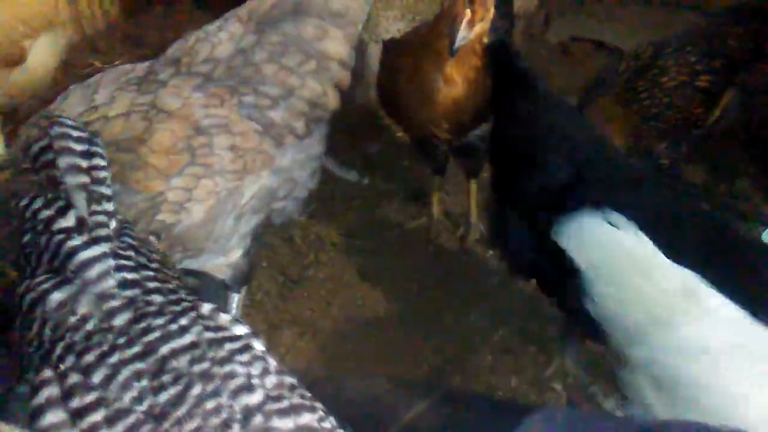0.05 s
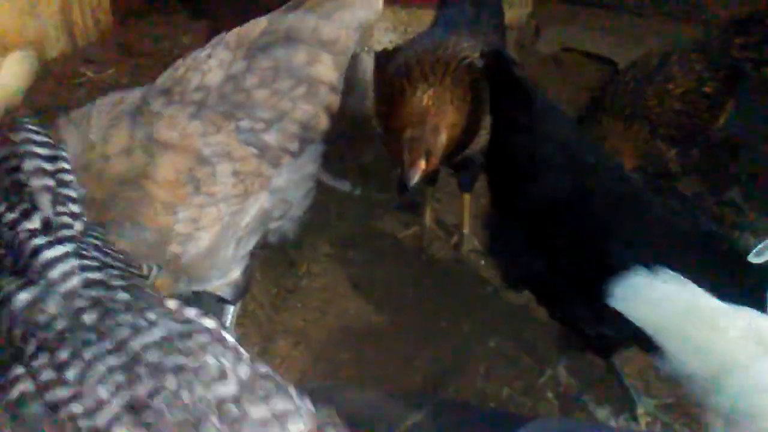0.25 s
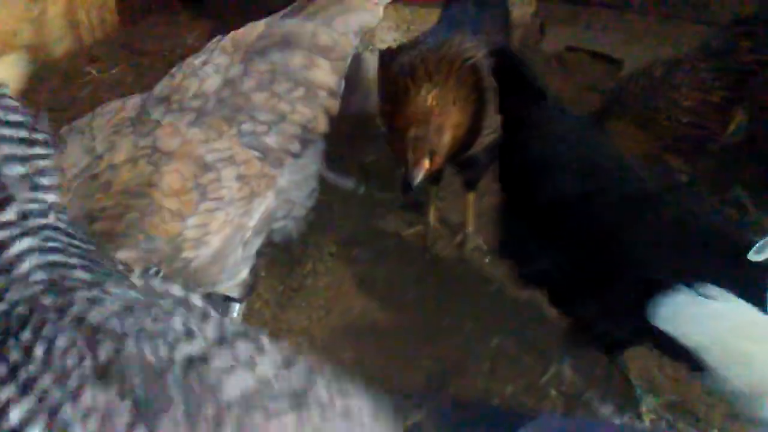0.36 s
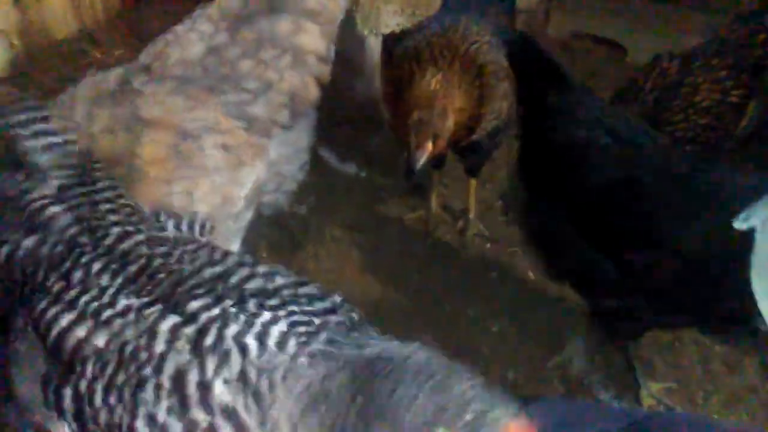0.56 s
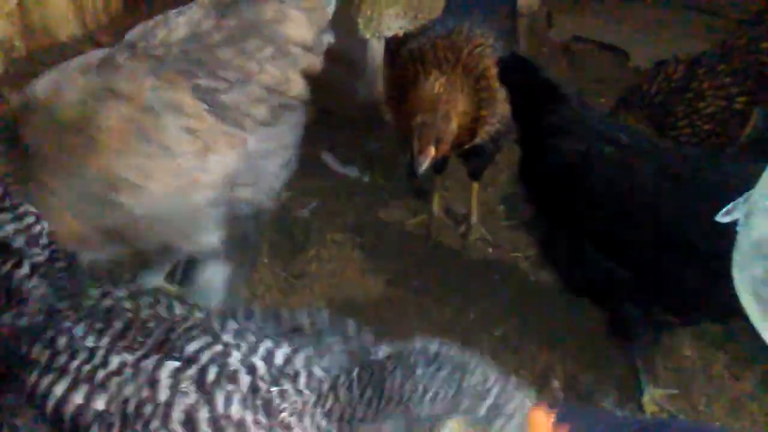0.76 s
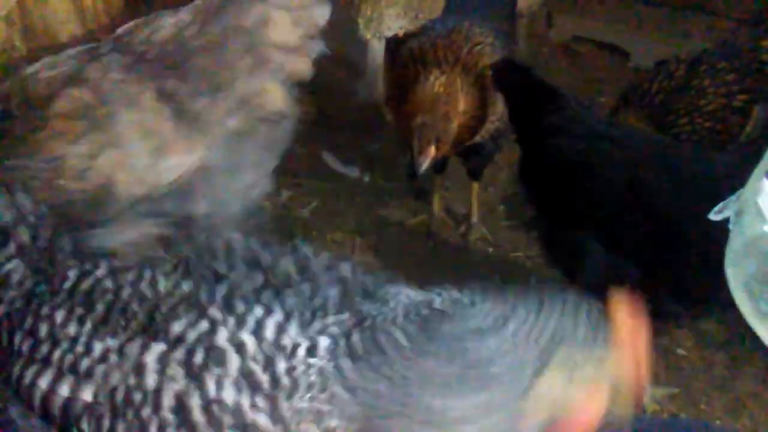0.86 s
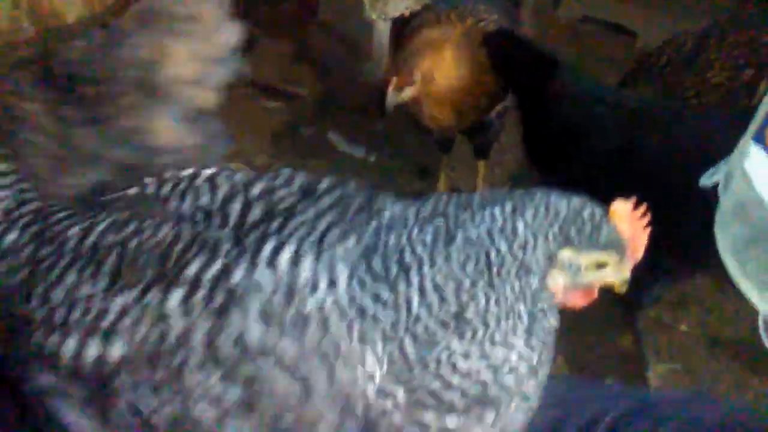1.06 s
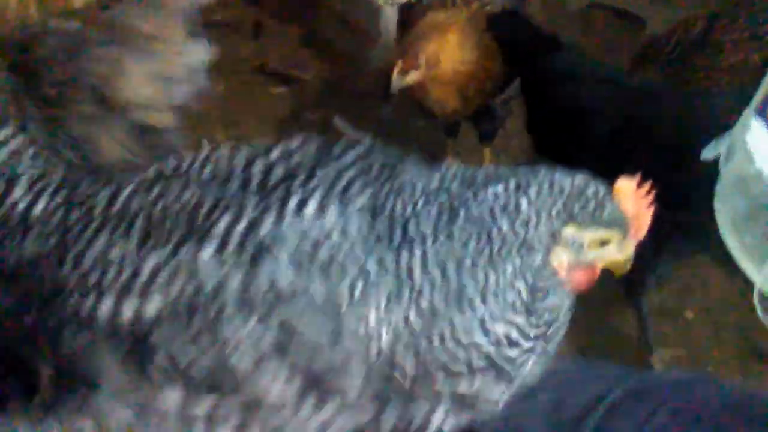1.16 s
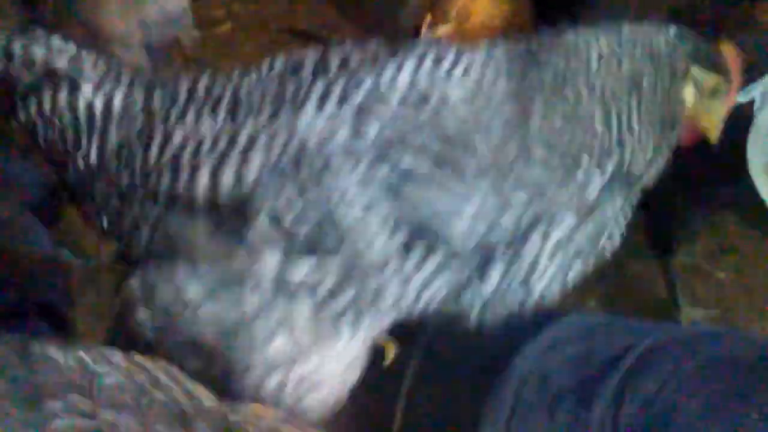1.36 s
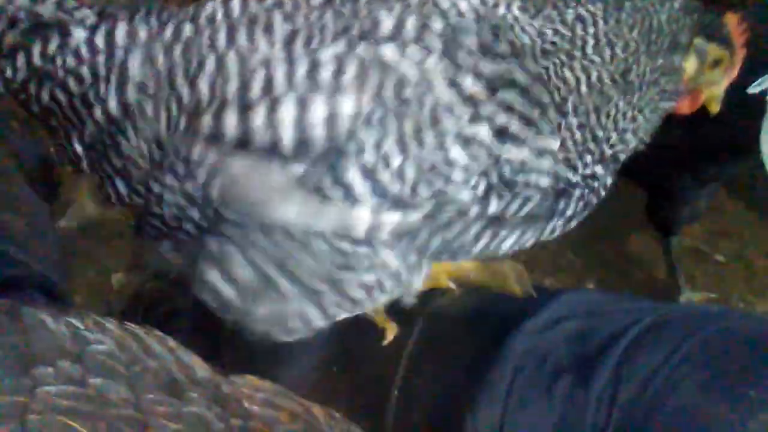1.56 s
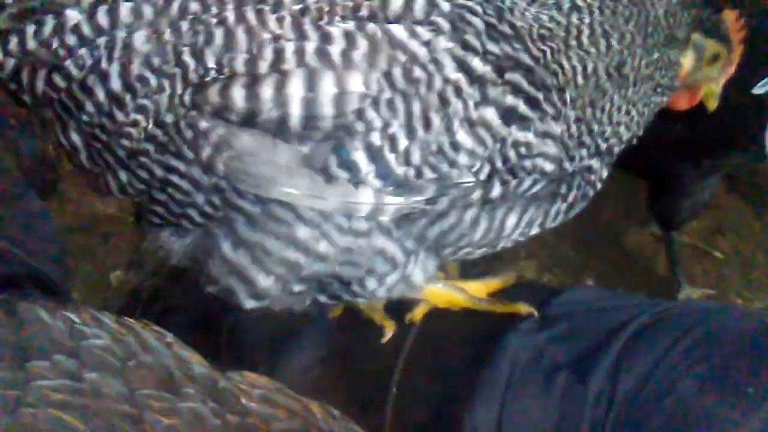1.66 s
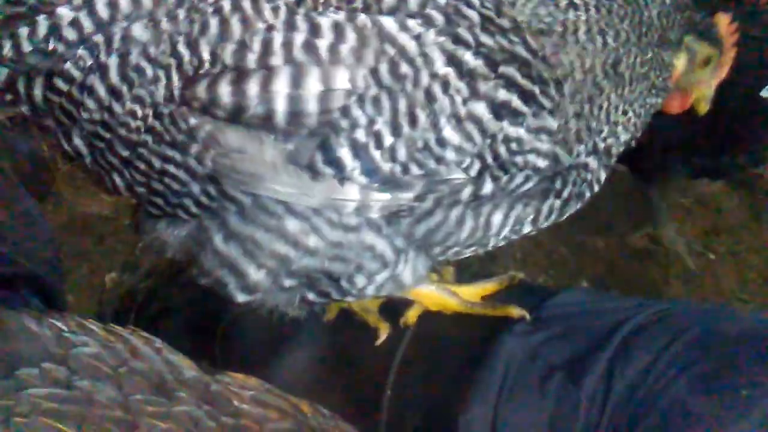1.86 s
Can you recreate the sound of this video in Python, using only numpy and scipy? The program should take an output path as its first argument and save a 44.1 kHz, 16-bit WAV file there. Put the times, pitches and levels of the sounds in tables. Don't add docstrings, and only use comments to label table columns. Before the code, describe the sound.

Young chickens cluck and peep close by in a small coop, with feet knocking and litter scuffling.

```python
import sys
import numpy as np
from scipy import signal
from scipy.fft import rfft, irfft, next_fast_len
from scipy.io import wavfile
from scipy.ndimage import uniform_filter1d

SR = 44100
rng = np.random.default_rng(int(sys.argv[2]) if len(sys.argv) > 2 else 0)


def dump_mix(stems):
    frames = np.atleast_2d(stems).T
    limited = np.clip(frames, -1, 1)
    pcm = np.round(limited * 32767).astype(np.int16)
    wavfile.write(sys.argv[1], SR, pcm)


def volts_from_decibels(level):
    exponent = np.asarray(level, float) / 20
    return 10 ** exponent


N = 83790

# t/s, f/Hz, level/dB after the microphone
PEEP1_LOW = [(.095, 3824, -43), (.11, 3560, -48.5), (.155, 2938, -36), (.17, 2833, -15.5),
             (.187, 2566, -21.5), (.2, 1942, -23), (.208, 1227, -9), (.232, 1074, -41.5)]
PEEP1_HIGH = [(0.091, 4760, -84), (0.109, 4550, -77), (.125, 4120, -41), (0.144, 3853, -27),
              (0.155, 3720, -28), (0.167, 3220, -70)]
PEEP2_LOW = [(0.531, 4020, -52), (0.566, 3512, -41), (0.593, 2950, -40), (.645, 2552, -34.5),
             (0.658, 2408, -34.5), (0.667, 1648, -8), (0.672, 1083, -28.5), (.685, 1276, -37)]
PEEP2_HIGH = [(.485, 6800, -53.5), (0.538, 5690, -65.5), (.565, 4800, -68.5), (0.597, 4240, -39.5),
              (0.611, 3930, -40), (0.626, 3400, -43), (0.632, 2800, -50)]
PEEP3_LOW = [(1.385, 3255, -65), (1.418, 3925, -33.5), (1.452, 3560, -36.5), (1.49, 3047, -30.5),
             (1.55, 2711, -27.5), (1.598, 2654, -21.5), (1.613, 2584, -27)]
PEEP3_HIGH = [(1.4, 5947, -57), (1.418, 5430, -65), (1.436, 4920, -55), (1.452, 4856, -58),
              (1.48, 4520, -53.5), (1.529, 4147, -33), (1.57, 4038, -24.5), (1.611, 3410, -28.5),
              (1.63, 2602, -9.5), (1.654, 2240, -88)]
# start t/s, length/s, rate f/Hz, depth/0-1
FLUTTER = [
    (0.162, 0.059, 689, 0.67),
    (0.616, 0.032, 650, 1),
    (1.51, 0.081, 234, 0.45),
]
PEEP_RICHNESS = [-0.5, 4, -2]
VOICE_OVERTONES = [
    [-15, -26, -19],
    [-10, -22, -50],
]
# times low, times high, level/dB
SUM_TONES = [(0.81, 1, -21), (2, 1.1, -21.5), (1.1, 2, -16)]
# f/Hz, level/dB
BEAK = [(2500, 12), (3300, -2), (10800, -1), (13000, -12)]
# start t/s, length/s,
# level/dB, first f/Hz, last f/Hz
FAINT_WHISTLES = [(.355, 0.02, -47, 1970, 2500), (.495, .031, -45, 1570, 2230), (1.009, 0.05, -40, 1420, 1468),
                  (1.344, 0.02, -35, 1783, 1610), (1.422, 0.027, -33, 6900, 5100), (0.79, 0.06, -50, 3560, 3380),
                  (.81, .05, -53, 3150, 2950), (.845, .055, -51, 3350, 2750), (.885, .05, -53, 2550, 2380),
                  (1.075, .035, -50, 2550, 2400), (1.483, 0.0337, -40.5, 1360, 1100),
                  (1.507, 0.045, -42, 1080, 1300), (1.512, .035, -40.5, 1200, 1520),
                  (1.591, 0.024, -43, 1770, 1600), (1.654, 0.051, -44.5, 3010, 2696),
                  (1.691, 0.057, -42.5, 2450, 2270), (1.871, 0.0217, -49.5, 860, 1500)]
# start t/s, length/s, level/dB, first f/Hz, last f/Hz
CLUCKS = [(-.01, 0.048, -38, 368, 346), (0.047, 0.064, -37.5, 334.3, 357.5),
          (0.111, 0.091, -44, 365, 374.4), (0.206, 0.022, -22.5, 453, 466.4),
          (0.227, 0.069, -22, 442.3, 420.4), (0.312, .025, -39.5, 400, 396),
          (0.393, 0.039, -19, 480, 379.1), (0.981, 0.033, -37, 362.6, 355.6),
          (1.116, 0.058, -31.5, 349.5, 346.3), (1.111, 0.031, -33.5, 473, 503),
          (1.168, 0.072, -44, 340.6, 333.3), (1.381, 0.051, -25, 389.3, 374.7)]
# octave level/dB, upper partials level/dB, beak ring level/dB, fade/(dB per s)
HEN_VOICES = [(6, -3, -15, -100), (5.5, 6.5, 6, -14), (-29, 3, 13, -43), (-13.5, -10, -6, -6),
              (-7.5, -7.5, -10, -120), (-5, -5, -7, -47), (4, -7.5, 11.5, 15), (-10, 3.5, -4, -46),
              (-7, -10.5, 13, 87), (-11, -21, 5, -34), (-13, -6.5, 5.5, -38), (-12, -10, -1, -200)]
HOARSENESS = [.3, .07, .3, .3, .35, .3, .06, .25, .12, 0, .3, .12]
# f/Hz, level/dB
THROAT = [(400, -20.5), (1100, -7.5), (1450, -5.5), (2000, -20.5), (2700, -16.5), (4000, -32.5),
          (7500, -24.5), (12000, -36)]
# t/s, peak level/dB, ring f/Hz
KNOCKS = [(0.4772, -6.5, 364), (0.489, -24.5, 340), (0.504, -23.5, 333), (0.557, -30, 334),
          (0.725, -25, 362), (0.728, -33.5, 190), (0.762, -43, 222), (0.806, -49, 245), (.864, -37, 780),
          (0.877, -43.5, 202), (0.95, -36, 325), (1.010, -18, 616), (1.309, -32, 392), (1.444, -43, 264),
          (1.491, -37, 245), (1.512, -39, 235), (1.663, -43, 318), (1.802, -36, 472), (1.874, -40, 297)]
# t/s, peak level/dB, centre f/Hz
TICKS = [(.0538, -45, 8600), (0.4755, -21.5, 8750), (0.663, -39, 8800), (.725, -31, 1610),
         (0.944, -34.5, 1010), (0.9992, -35.5, 7800), (1.361, -41, 7450), (1.3839, -32, 10500),
         (1.446, -23, 11000), (1.541, -40, 12100), (1.689, -26, 8200), (1.724, -29.5, 1420),
         (1.798, -31, 8000), (1.803, -32, 1680)]
# start t/s, length/s, level/dB, centre f/Hz
SCUFFLES = [(0.162, 0.084, -20, 1320), (0.253, 0.067, -24.5, 1060), (0.45, 0.066, -20, 750),
            (0.97, 0.047, -39, 376), (0.641, 0.073, -28, 1380), (0.95, 0.02, -39.5, 800),
            (0.986, 0.12, -35, 1210), (1.106, 0.076, -31, 1510), (1.287, 0.049, -38, 930),
            (1.683, 0.056, -32.5, 2950), (1.036, 0.046, -39, 480), (-.01, 0.027, -29, 1100),
            (.645, 0.054, -29.5, 474), (1.793, 0.053, -50, 3800), (0.887, 0.013, -43, 360)]
# start t/s, length/s, level/dB, centre f/Hz
RUSTLES = [(0.115, 0.13, -31.5, 8450), (.225, 0.042, -30, 8200), (0.402, .042, -30, 7160),
           (0.449, 0.067, -37, 8560), (0.552, 0.11, -32, 8650), (1.389, 0.044, -31, 8750),
           (1.554, 0.067, -33.5, 10300), (1.682, 0.079, -25.5, 7100), (1.657, 0.017, -39, 7670),
           (1.796, 0.068, -42.5, 7870)]
# f/Hz, level/dB per Hz
FLOCK = [(71, -52), (120, -6), (182, -4.5), (2120, -8.5), (3170, -16.5), (4200, -49), (5460, -77),
         (9240, -120)]
# t/s, level/dB
BUSTLE = [(0, -54.5), (.37, -45), (.6, -39.5), (0.731, -40.5), (0.79, -49.5), (1.2, -45.5), (1.267, -58.5),
          (1.3, -49.5), (1.45, -42.5), (1.9, -49.5)]
# f/Hz, level/dB
MICROPHONE = [(120, -20.5), (160, -2), (250, 2), (4050, -5), (4400, -28), (4700, -48), (5350, -27),
              (7000, -17.5), (10000, -17), (12500, -25.5)]


def curve(points, hz):
    p = np.array(points, float)
    return np.interp(np.log(np.maximum(hz, 1)), np.log(p[:, 0]), p[:, 1])


def colour(x, points):
    n = next_fast_len(N + 4096)
    hz = np.arange(n // 2 + 1) * SR / n
    return irfft(rfft(x, n) * volts_from_decibels(curve(points, hz)), n)[:N]


def unit(x):
    return x / np.sqrt(np.mean(x ** 2))


def walk(rate):
    k = int(SR / rate)
    return unit(uniform_filter1d(uniform_filter1d(rng.standard_normal(N), k), k))


def gate(start, length, edge):
    t = np.arange(N) / SR
    inside = np.minimum(t - start, start + length - t)
    return np.sin(np.pi / 2 * np.clip(inside / edge, 0, 1)) ** 2


def band(x, hz, q):
    return signal.lfilter(*signal.iirpeak(min(hz, SR / 3), q, SR), x)


def double_band(x, hz, q):
    return band(band(x, hz, q), hz, q)


def track(rows):
    r, t = np.array(rows, float), np.arange(N) / SR
    hz, db = [np.interp(t, r[:, 0], column) for column in r.T[1:]]
    return hz, db, gate(r[0, 0], r[-1, 0] - r[0, 0], 0.0027)


def whistle(hz, gain, overtones_db=(), rough=1):
    wobble, roughness = rough * .007, rough * .17
    phase = 2 * np.pi * np.cumsum(hz * (1 + wobble * walk(88))) / SR
    glide = uniform_filter1d(np.abs(np.gradient(hz)) * SR, size=200) / 52000
    upper = 0
    for k, db in enumerate(overtones_db, 2):
        patchy = volts_from_decibels(db + curve(BEAK, k * hz) + 4.5 * walk(38)) * (1 + .5 * walk(200))
        smother = np.where(k * hz < 2700, 1, 1 / (1 + glide ** 4))
        smother = np.where(k * hz < 2700, smother, 1 / (1 + glide ** 4))
        upper = upper + patchy * np.sin(k * phase) * smother * (k * hz < SR / 2.2)
    relative = (gain / 0.041 + 0.075) ** -.4
    return np.sqrt(2) * gain * (1 + roughness * walk(250)) * (np.sin(phase) + relative * upper), phase


def sum_tones(low_gain, low_phase, high_gain, high_phase, rich_db):
    tones = 0
    for m, n, db in SUM_TONES:
        patchy = volts_from_decibels(db + rich_db + 4.5 * walk(36)) * (1 + .4 * walk(250))
        tones = tones + patchy * np.sin(m * low_phase + n * high_phase)
    return (low_gain * high_gain) ** 0.47 * tones


def peeps():
    out = 0
    pairs = (PEEP1_LOW, PEEP1_HIGH), (PEEP2_LOW, PEEP2_HIGH), (PEEP3_LOW, PEEP3_HIGH)
    for rich_db, pair, (start, length, rate_hz, depth) in zip(PEEP_RICHNESS, pairs, FLUTTER):
        flutter_phase = 2 * np.pi * np.cumsum(rate_hz * (1 + 0.18 * walk(119))) / SR
        shake = depth * gate(start, length, 0.011) * np.sin(flutter_phase)
        voices = []
        for rows, overtones_db in zip(pair, VOICE_OVERTONES):
            hz, db, on = track(rows)
            gain = on * volts_from_decibels(np.minimum(db - curve(MICROPHONE, hz), -18))
            voices.append((gain, *whistle(hz, gain, np.add(overtones_db, rich_db))))
        (low_gain, low, low_phase), (high_gain, high, high_phase) = voices
        out = out + sum_tones(low_gain, low_phase, high_gain, high_phase, rich_db)
        if rate_hz < 400:
            air = low + high * (1 + shake)
        else:
            air = (low + high) * (1 + shake + shake ** 2)
        size = np.sqrt(uniform_filter1d(air ** 2, 800) + 1e-6)
        out = out + air + 0.054 * 0.35 * air ** 2 / size
    return out


def faint_whistles():
    out, t = 0, np.arange(N) / SR
    for start, length, db, first_hz, last_hz in FAINT_WHISTLES:
        hz = np.interp(t, [start, start + length], [first_hz, last_hz])
        out = out + whistle(hz, volts_from_decibels(db) * gate(start, length, 0.084 * length), rough=3.2)[0]
    return out


def clucks():
    out, t = 0, np.arange(N) / SR
    attack_s, release_s, settle = 0.007, .005, 4.9
    for call, voice, rough in zip(CLUCKS, HEN_VOICES, HOARSENESS):
        start, length, db, first_hz, last_hz = call
        octave_db, upper_db, beak_db, fade_db = voice
        u = np.clip((t - start) / length, 0, 1)
        hz = last_hz + (first_hz - last_hz) * np.exp(-settle * u)
        attack = np.clip((t - start) / attack_s, 0, 1)
        release = np.exp(-np.maximum(t - start - length, 0) / release_s)
        on = attack * release * volts_from_decibels(db + fade_db * u * length)
        phase = 2 * np.pi * np.cumsum(hz * (1 + 0.0293 * rough * walk(250))) / SR
        shaky = [1 + rough * walk(150), 1 + 2 * rough * walk(190),
                 .5 + 3 * rough * walk(270), 0.11 + walk(350)]
        upper = 0
        for k in range(3, 30):
            beak_ring_db = beak_db * np.exp(-((k * last_hz - 2550) / 510) ** 2)
            level = volts_from_decibels(curve(THROAT, k * last_hz) + beak_ring_db)
            upper = upper + level * shaky[1 + (k > 4) + (k > 11)] * np.sin(k * phase + 1.3 * k * k)
        breath = unit(colour(rng.standard_normal(N), THROAT)) * (1 + np.cos(phase)) * (rough + 0.22)
        fundamental = shaky[0] * np.sin(phase)
        octave = volts_from_decibels(octave_db) * shaky[1] * np.sin(2 * phase + 3.54)
        out = out + np.sqrt(2) * on * (fundamental + octave + volts_from_decibels(upper_db) * (upper + breath))
    return out


def knocks():
    out, t = np.zeros(N + 4096), np.arange(4096) / SR
    for s, db, hz in KNOCKS:
        u = t * hz / 0.42
        thump = 2 * u ** 2 * np.exp(-u) * np.sin(2 * np.pi * hz * t)
        grit_tail = volts_from_decibels(-8.5) * band(rng.standard_normal(4096), 1500, 0.58) * np.exp(-t / 0.0052)
        out[int(s * SR):int(s * SR) + 4096] += volts_from_decibels(db) * (thump + grit_tail)
    return out[:N]


def claw_ticks():
    out, t = np.zeros(N + 4096), np.arange(4096) / SR
    for s, db, hz in TICKS:
        burst = rng.standard_normal(4096) * np.exp(-t / 0.0027)
        out[int(s * SR):int(s * SR) + 4096] += volts_from_decibels(db) * 4 * double_band(burst, hz, 1.6)
    return out[:N]


def grit():
    return unit(rng.standard_normal(N) * volts_from_decibels(3 * walk(300) + 2.3 * walk(110)))


def scuffles():
    out, t = 0, np.arange(N) / SR
    for s, length, db, hz in SCUFFLES:
        fade = volts_from_decibels(db - 15 * np.clip((t - s) / length, 0, 1))
        shape = gate(s, 1.09 * length, .5 * length) ** 0.17 * np.clip((t - s) / 0.0013, 0, 1)
        out = out + fade * shape * unit(band(band(grit(), hz, 1.0), hz, 0.79))
    return out


def rustles():
    out, t = 0, np.arange(N) / SR
    for s, length, db, hz in RUSTLES:
        fade = volts_from_decibels(db - 11 * np.clip((t - s) / length, 0, 1))
        hiss = unit(double_band(grit() + rng.standard_normal(N), hz, 3.2))
        out = out + fade * gate(s, length, 0.16 * length) * hiss
    return out


def flock():
    bed, rows = 0, np.array(BUSTLE)
    for hz in 170 * 2 ** np.arange(0, 4.7, .5):
        bed = bed + band(grit(), hz, 0.84) * volts_from_decibels(curve(FLOCK, hz) + 1.68 * walk(15.0))
    air = volts_from_decibels(-2) * unit(band(grit(), 11000, 1.0))
    return (unit(bed) + air) * volts_from_decibels(np.interp(np.arange(N) / SR, rows[:, 0], rows[:, 1]))


def scene():
    birds = peeps() + faint_whistles() + clucks()
    near = birds + knocks() + claw_ticks() + scuffles() + rustles() + flock()
    t = np.arange(8000) / SR
    tail = rng.standard_normal(8000) * volts_from_decibels(-60 * t / 0.086) * (t > .004)
    room = signal.fftconvolve(near, tail / np.sqrt(np.sum(tail ** 2)))[:N]
    return (near + volts_from_decibels(-13) * room)[None]


def band_limit(x):
    return signal.sosfilt(signal.butter(12, 15730, fs=SR, output="sos"), x)


def record(dry):
    hum = volts_from_decibels(-67) * unit(double_band(rng.standard_normal(N), 59.8, 1.8))
    hiss_colour = [(4200, -12.5), (5200, -11.5), (8000, 2), (15000, -7)]  # f/Hz, level/dB
    hiss = volts_from_decibels(-67.5) * unit(colour(rng.standard_normal(N), hiss_colour))
    mix = (colour(dry[0], MICROPHONE) + hum + hiss)[None]
    return band_limit(mix)


dry = scene()
out = record(dry)
dump_mix(out)
```